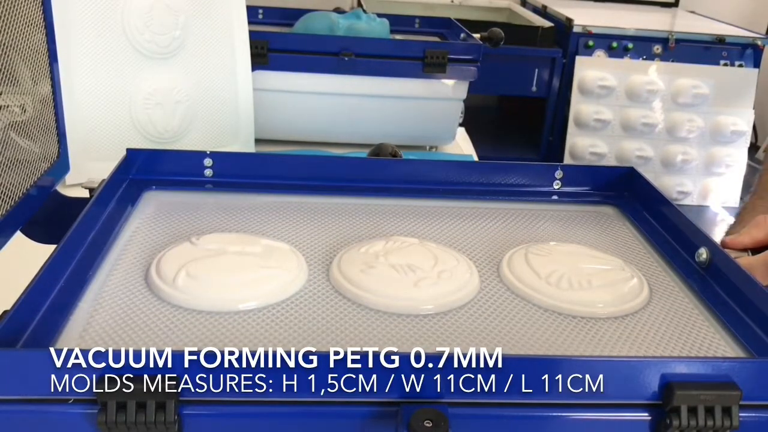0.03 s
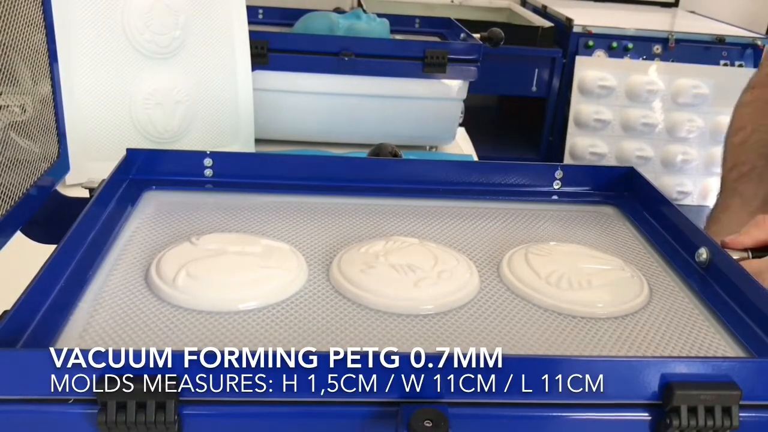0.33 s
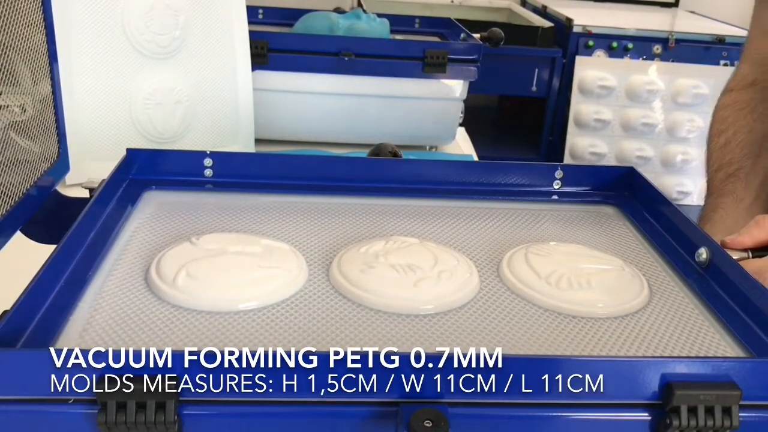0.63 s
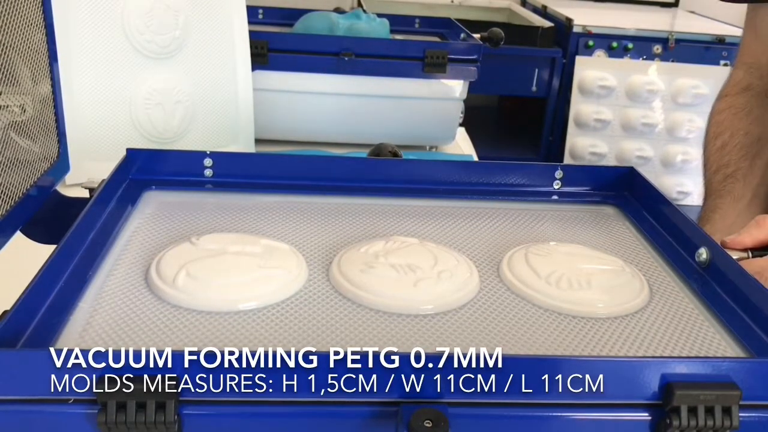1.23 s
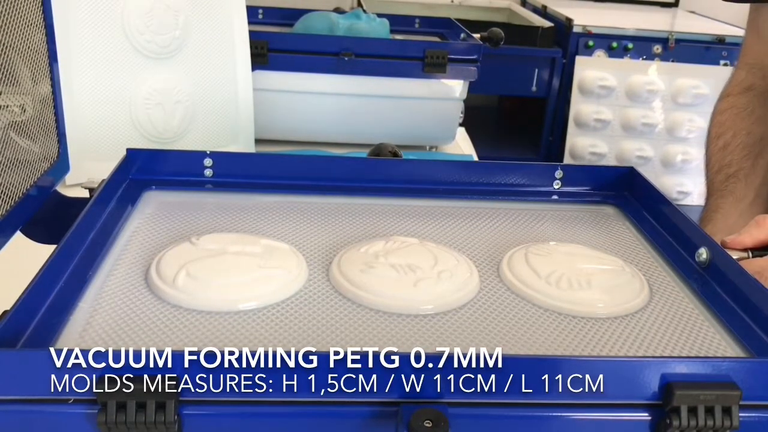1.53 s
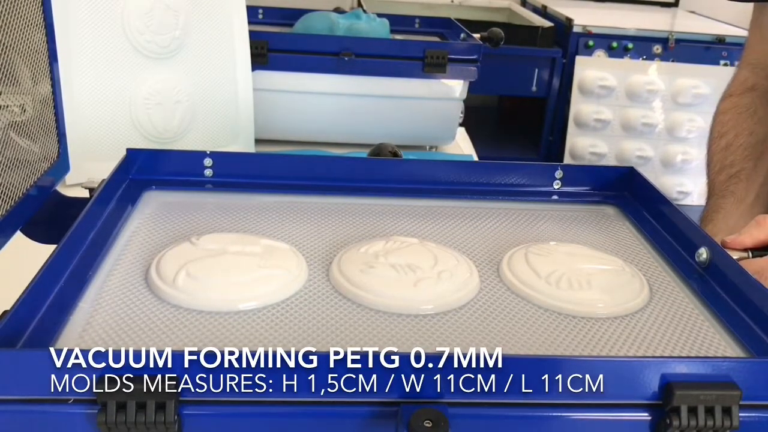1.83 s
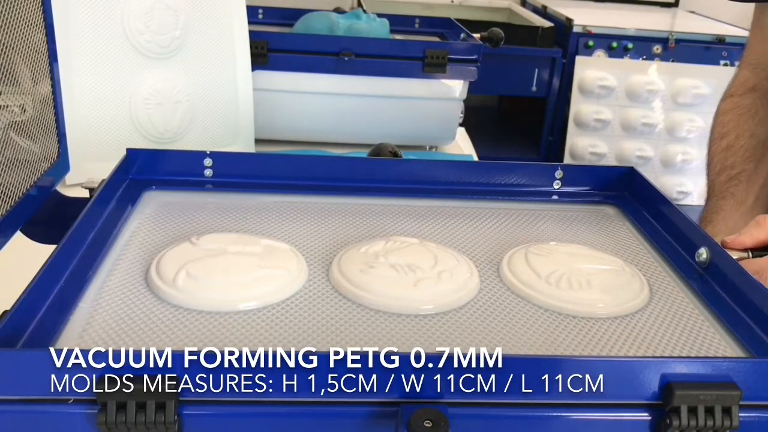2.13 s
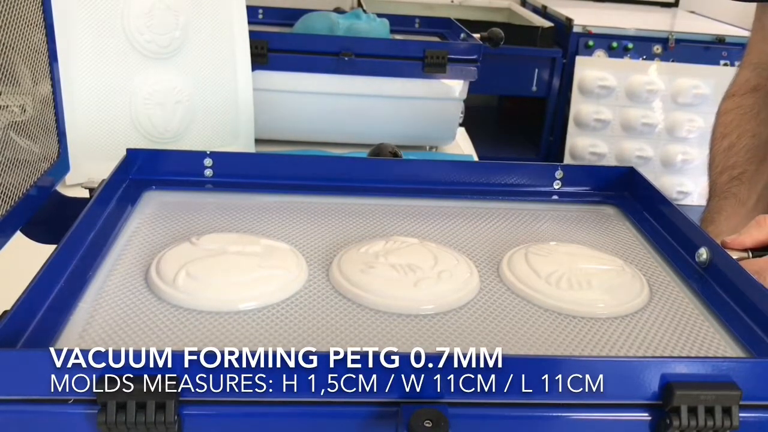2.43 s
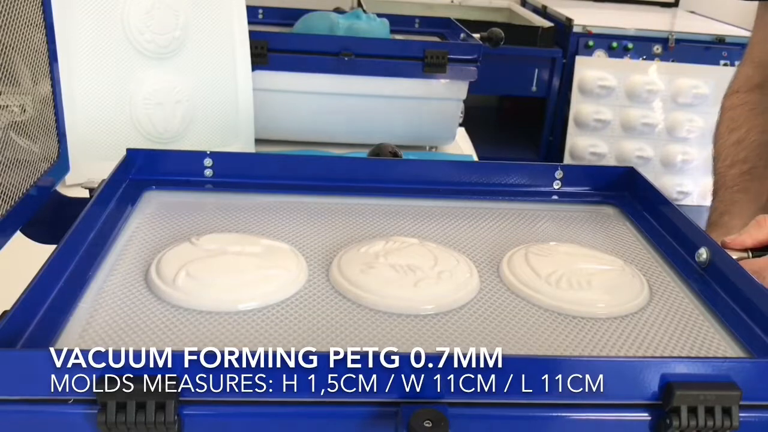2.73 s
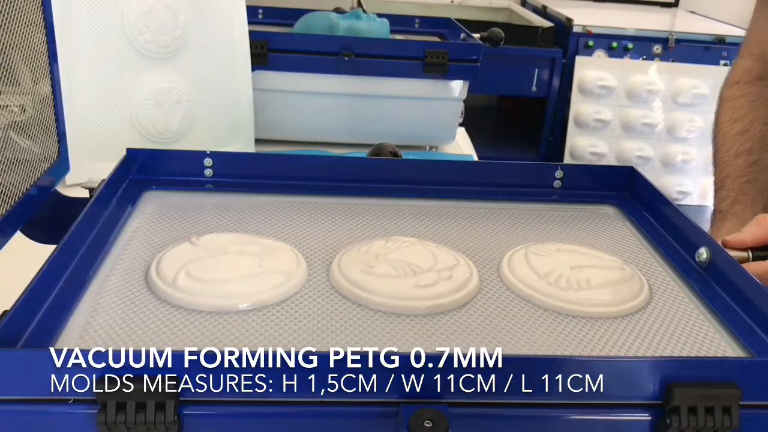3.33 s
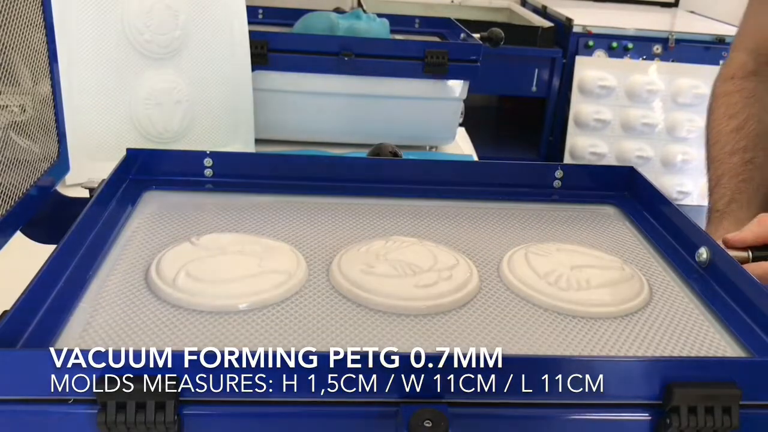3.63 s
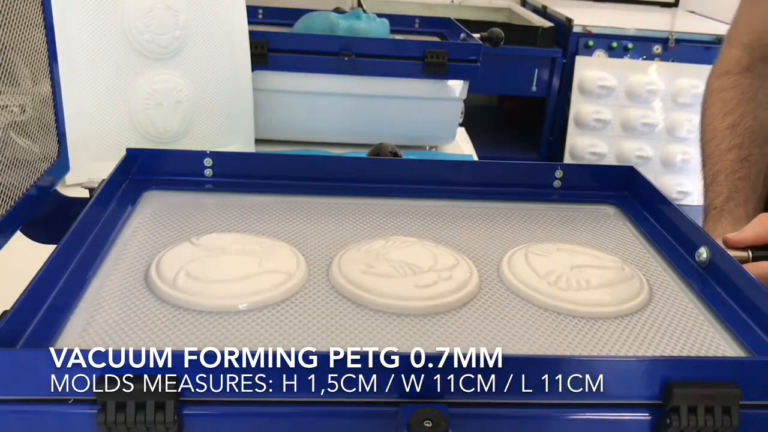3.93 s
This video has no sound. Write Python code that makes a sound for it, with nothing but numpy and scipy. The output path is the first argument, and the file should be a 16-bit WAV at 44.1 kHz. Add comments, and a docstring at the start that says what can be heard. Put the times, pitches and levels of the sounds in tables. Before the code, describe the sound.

A vacuum pump hums and sizzles, clicks off, then air hisses softly.

```python
"""Vacuum pump switching off

The four-vane pump of a forming machine runs steadily: mains hum, vane tones, and a rattle
and bright sizzle that partly repeat with the shaft. A switch snaps and the pump coasts to
rest, its dying hum lingering and its loose vanes ticking. A valve chirps and lets air back in
with a soft hiss. A low rumble and the quiet workshop remain."""
import sys
import numpy as np
from scipy import signal
from scipy.fft import rfft, irfft
from scipy.io import wavfile
from scipy.ndimage import uniform_filter1d, map_coordinates

SR = 44100
rng = np.random.default_rng(int(sys.argv[2]) if len(sys.argv) > 2 else 0)


def put_to_file(sound):
    """Save the sound as 16-bit audio at rate SR, in the file named by the first command-line argument."""
    columns = np.atleast_2d(sound).T  # one column per channel
    safe = np.clip(columns, -1, 1)
    whole_steps = np.round(safe * 32767)
    wavfile.write(sys.argv[1], SR, whole_steps.astype(np.int16))


N = 176400
T = np.arange(N) / SR
SHAFT_HZ, OFF_S = 47.03, 2.632


def undb(db):
    """Decibels to gain."""
    return 10 ** (np.asarray(db) / 20)


def unit(x):
    """Scale to rms 1."""
    return x / np.sqrt(np.mean(x ** 2))


def colour(x, points):
    """Shape by (Hz, dB) points, falling 36 dB per octave outside them; rms 1."""
    hz, db = np.array(sorted(points), float).T
    octave, knots = np.log2(np.arange(1, N // 2 + 2) * SR / N), np.log2(hz)
    outside = np.maximum(knots[0] - octave, 0) + np.maximum(octave - knots[-1], 0)
    gain = undb(np.interp(octave, knots, db) - 36 * outside)
    return unit(irfft(rfft(x) * gain, N))


def noise(points):
    """Coloured noise, rms 1."""
    return colour(rng.standard_normal(N), points)


def drift(rate_hz):
    """Smooth random drift, rms 1."""
    hold = int(SR / rate_hz)
    steps = np.repeat(rng.standard_normal(N // hold + 1), hold)
    return unit(uniform_filter1d(uniform_filter1d(steps, hold), hold)[:N])


def fade(start_s, decay_s):
    """Full until the start, then an exponential fall."""
    return np.exp(-np.maximum(T - start_s, 0) / decay_s)


def rise(start_s, attack_s):
    """Zero until the start, then a linear rise to 1."""
    return np.clip((T - start_s) / attack_s, 0, 1)


def tone(cycles, db, flutter_db=0, flutter_hz=13.76):
    """Sine at an rms level, with optional level flutter."""
    amplitude = np.sqrt(2) * undb(db + flutter_db * drift(flutter_hz))
    return amplitude * np.sin(2 * np.pi * (cycles + rng.random()))


def shaft_turns(wow=0.000161, coast_s=0.8):
    """Turns made so far: near-steady speed, then even braking by friction."""
    speed_hz = SHAFT_HZ * (1 + wow * drift(5)) * (1 - rise(OFF_S, coast_s))
    return np.cumsum(speed_hz) / SR


# Each row: multiple of the shaft rate, level in dB.
VANE_ORDERS = [(1, -62), (4, -43.5), (8, -60), (12, -52), (13, -68.5), (14, -74), (15, -61), (16, -36),
               (20, -55.5), (24, -59), (26, -59.5), (28, -58.5), (40, -64), (80, -68), (98, -70),
               (172, -65), (177, -59), (188, -58), (199, -61), (234, -59), (240, -64), (272, -54),
               (292, -62), (328, -58), (332, -56), (334, -54)]
# Each row: frequency at full speed in Hz, level in dB.
BEARING_WHINES = [(247, -56.5), (946, -56), (1146.5, -56), (1162, -58.5)]


def pump_tones(turns):
    """Vane tones and bearing whines follow the shaft; they and the mains hum die at power-off."""
    vanes = sum(tone(order * turns, db) for order, db in VANE_ORDERS)
    whines = sum(tone(hz / SHAFT_HZ * turns, db, flutter_db=3, flutter_hz=8.86)
                 for hz, db in BEARING_WHINES)
    hum = tone(100 * T, db=-43.5, flutter_db=0.4, flutter_hz=5.7)
    return (vanes + whines) * fade(OFF_S, 0.047) + hum * fade(OFF_S, 0.12)


def scrape(turns, repeat, rough_db, vane_db, grains=900, spots=40):
    """Friction noise, partly the same each turn, modulated by rough spots and four vanes."""
    def around(track, order):
        return map_coordinates(track, [turns % 1 * len(track)], order=order, mode="grid-wrap")

    locked = around(rng.standard_normal(grains), order=3)
    friction = np.sqrt(repeat) * locked + np.sqrt(1 - repeat) * rng.standard_normal(N)
    roughness = around(unit(rng.standard_normal(spots)), order=1)
    vanes = np.cos(2 * np.pi * 4 * turns)
    return friction * undb(rough_db * roughness + vane_db * vanes)


# Each row: frequency in Hz, relative density in dB.
RATTLE_SPECTRUM = [(30, -38), (48, -16), (75, -14), (115, -17.5), (180, -3.5), (225, -11.5), (300, -15.5),
                   (380, -11.5), (500, -18.5), (620, -15), (730, -4), (810, -14.5), (1000, -9.5),
                   (1250, -12), (1400, -16), (1750, -20), (2020, -17.5), (2400, -40)]


def body_rattle(turns):
    """The pump body rattles, fading as the shaft slows."""
    drive = scrape(turns, repeat=0.077, rough_db=1.9, vane_db=2)
    return undb(-44.5) * colour(drive, RATTLE_SPECTRUM) * fade(OFF_S, 0.2)


# Each row: frequency in Hz, relative density in dB.
SIZZLE_SPECTRUM = [(2150, -14), (2370, -15), (2650, -10), (3430, -15), (3900, -8), (4350, -15.5),
                   (4700, -11), (5050, -21), (5900, -14.5), (7130, -14.5), (8070, -7), (8700, -4.5),
                   (9670, -4.5), (10350, -9), (11000, -2.5), (12700, -1), (14000, -5), (14900, -6.5),
                   (15700, 0)]


def vane_sizzle(turns):
    """Vanes scrape the chamber wall, opposite vanes much alike."""
    per_turn = scrape(turns, repeat=0.31, rough_db=1.5, vane_db=-1.3)
    per_half_turn = scrape(2 * turns, repeat=0.52, rough_db=1.5, vane_db=1, grains=450, spots=20)
    return undb(-38) * colour(casing_ring(per_turn + 0.58 * per_half_turn), SIZZLE_SPECTRUM)


def casing_ring(x, share=0.23, decay_s=0.018):
    """Dense, short metal modes put a fine ripple on the spectrum."""
    tail = (rng.standard_normal(N) * fade(0, decay_s))[:SR // 10]
    ringing = signal.fftconvolve(x, tail)[:N] / np.linalg.norm(tail)
    return np.sqrt(1 - share) * x + np.sqrt(share) * ringing


# Each row: frequency in Hz, bandwidth in Hz, level in dB.
CHATTER_MODES = [(2035, 57, -63.5), (2597, 43, -65.5), (4635, 76, -63), (4765, 42, -65.5), (8350, 70, -58),
                 (8800, 70, -57.5), (9320, 71, -57.5), (11800, 150, -55), (12870, 110, -51.5),
                 (13000, 110, -53), (15760, 150, -53)]


def vane_chatter(turns):
    """Uneven vane contacts ring narrow resonances of the casing."""
    drive = scrape(turns, repeat=0.36, rough_db=2.5, vane_db=1) * undb(1.6 * drift(40.07))
    return sum(undb(db) * unit(signal.lfilter(*signal.iirpeak(hz, hz / width_hz, fs=SR), drive))
               for hz, width_hz, db in CHATTER_MODES)


def vane_contact(drop_s=2.825, drop_db=-6.5):
    """Wavering contact gain; it falls as the slowing vanes lose touch with the wall."""
    level_db = 0.66 * drift(24.98) + drop_db * rise(drop_s, 0.033)
    return undb(level_db) * fade(OFF_S, 0.13)


# Each row of both: frequency in Hz, relative density in dB.
SNAP_SPECTRUM = [(80, -4), (300, -4), (1200, 1.5), (2500, -8), (5000, -5), (9000, -3), (15000, -15)]
CLUNK_SPECTRUM = [(70, 0), (200, -5), (330, -2), (480, -12), (700, -2), (850, -6), (1200, 0), (1600, -16),
                  (2600, -14), (4000, -11), (4700, -12), (5500, -20), (9000, -25)]


def switch():
    """The switch opens with a sharp snap and a longer, duller clunk."""
    snap = undb(-33) * noise(SNAP_SPECTRUM) * fade(OFF_S, 0.006)
    clunk = undb(-42) * noise(CLUNK_SPECTRUM) * fade(OFF_S, 0.115)
    return (snap + clunk) * (T > OFF_S)


# Each row: frequency in Hz, level in dB, time to fall 60 dB in seconds.
LINGERING_TONES = [(85, -47, .7), (151.3, -48, .8), (180.7, -50, .6), (290, -56, .6), (340, -56, .6),
                   (562, -49, .7), (687, -47, .95), (748, -45, .8), (1020, -53, .75), (1146, -50, .95),
                   (1215, -44.5, .9)]


def lingering_tones():
    """Wavering tones linger after switch-off: the dying hum, its room echo and some housing ring."""
    tail = np.zeros(N)
    for hz, db, t60_s in LINGERING_TONES:
        wavering = tone(hz * T + 0.17 * drift(44), db, flutter_db=3.5, flutter_hz=45)
        tail += wavering * fade(OFF_S, t60_s / np.log(1000))
    return tail * rise(OFF_S, 0.0094)


# Each row: start in seconds, level in dB, decay in seconds.
VANE_DROPS = [(2.815, -54, 0.02), (2.938, -57.5, .03), (3.072, -56, 0.014)]
# Each row: frequency in Hz, relative density in dB.
TICK_SPECTRUM = [(1500, -14), (3500, -5), (4700, 4), (7000, -13), (9000, 0), (11000, -7), (13000, -2),
                 (15500, -6)]


def vane_ticks():
    """Loose vanes drop and tick as the shaft slows."""
    envelope = sum(undb(db) * rise(start_s, 0.0027) * fade(start_s, decay_s)
                   for start_s, db, decay_s in VANE_DROPS)
    return noise(TICK_SPECTRUM) * envelope


def valve_chirp(start_s=3.487, hz=4300):
    """The valve chirps as it opens."""
    chirp = tone(hz * T + 0.3 * drift(500), db=-58, flutter_db=2.5, flutter_hz=300)
    return chirp * rise(start_s, 0.003) * fade(start_s + 0.005, 0.015)


# Each row of both: frequency in Hz, relative density in dB.
SEEP_SPECTRUM = [(1500, -13), (3800, 2.5), (5200, -7), (6400, 3), (7300, -7), (9000, -1.5), (12000, -5),
                 (15500, -17)]
RUSH_SPECTRUM = [(120, -51), (200, -21), (263, -23), (304, -2), (564, -2.5), (940, -1), (1070, -6),
                 (1190, -3), (2170, -7), (2650, -3), (5910, -2), (15500, -13.5)]


def air_return(rush_s=3.468, attack_s=0.04, hold_s=0.065, split_hz=8500):
    """Air seeps through the unpowered pump, then rushes in and dulls as the pressure evens out."""
    seep = undb(-62.5) * noise(SEEP_SPECTRUM) * rise(OFF_S, 0.092) * fade(OFF_S + 0.25, 0.51)
    hiss = noise(RUSH_SPECTRUM)
    low = signal.sosfiltfilt(signal.butter(2, split_hz, fs=SR, output="sos"), hiss)
    fall_s = rush_s + attack_s + hold_s
    rush = low * fade(fall_s, 0.13) + (hiss - low) * fade(fall_s, 0.068)
    return seep + undb(-52.5) * rush * rise(rush_s, attack_s)


# Each row: frequency in Hz, level in dB.
RUMBLE_TONES = [(51, -55.5), (72, -61)]


def rumble(start_s=3.45):
    """A low beating rumble comes up with the rush of air and stays."""
    tones = sum(tone(hz * T + 0.08 * drift(6.8), db, flutter_db=-0.5, flutter_hz=11)
                for hz, db in RUMBLE_TONES)
    return tones * rise(start_s, 0.07)


# Each row: frequency in Hz, relative density in dB.
WORKSHOP_SPECTRUM = [(20, -32), (33, -16), (48, -4), (70, 2.5), (110, -12.5), (250, -20), (700, -24),
                     (2000, -26.5), (5000, -34), (9000, -39), (15500, -39)]


def workshop():
    """Quiet, steady room noise, mostly bass."""
    return undb(-58) * noise(WORKSHOP_SPECTRUM)


def scene():
    """Sum of all sources, the same in both channels."""
    turns = shaft_turns()
    pump = pump_tones(turns) + body_rattle(turns)
    pump += (vane_sizzle(turns) + vane_chatter(turns)) * vane_contact()
    shutdown = switch() + lingering_tones() + vane_ticks() + valve_chirp() + air_return()
    mono = pump + shutdown + rumble() + workshop()
    return np.array([mono, mono])


def record(dry):
    """Steep low-pass at 15780 Hz."""
    return signal.sosfilt(signal.ellip(12, 0.1, 90, 15780, fs=SR, output="sos"), dry)


dry = scene()
out = record(dry)
put_to_file(out)
```